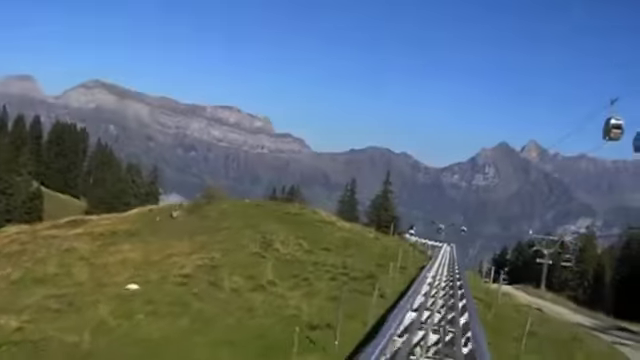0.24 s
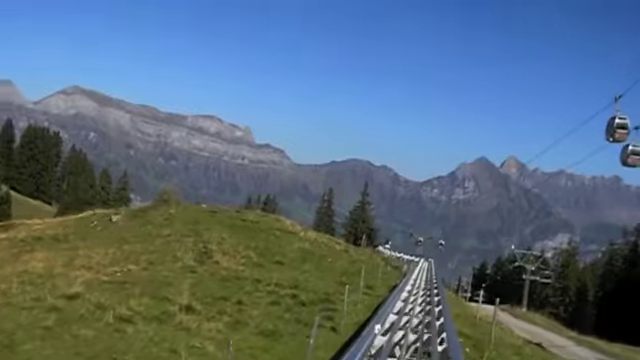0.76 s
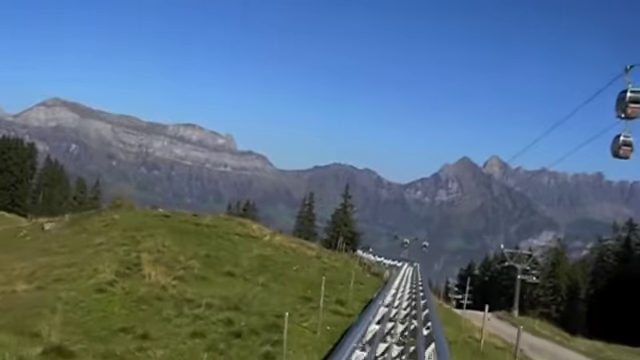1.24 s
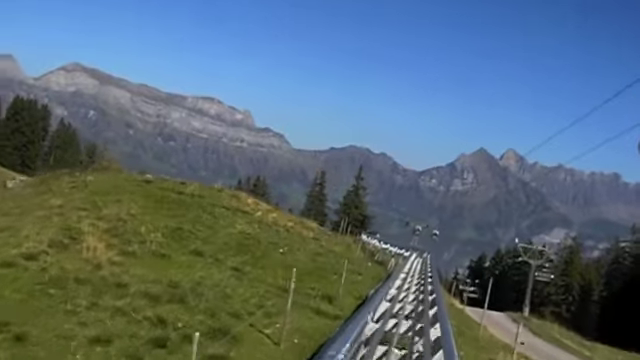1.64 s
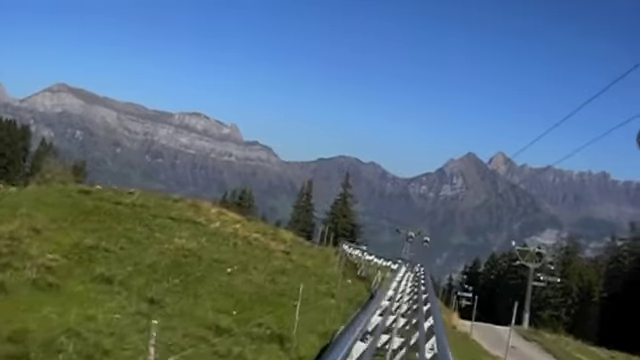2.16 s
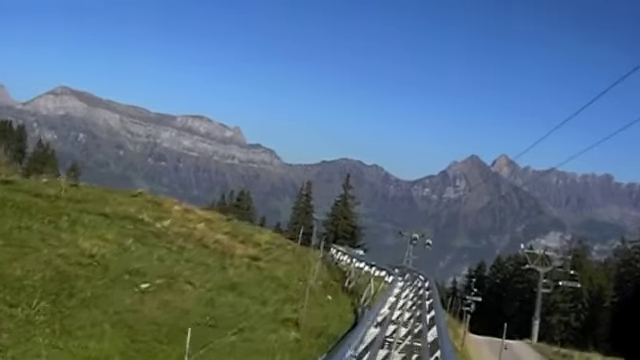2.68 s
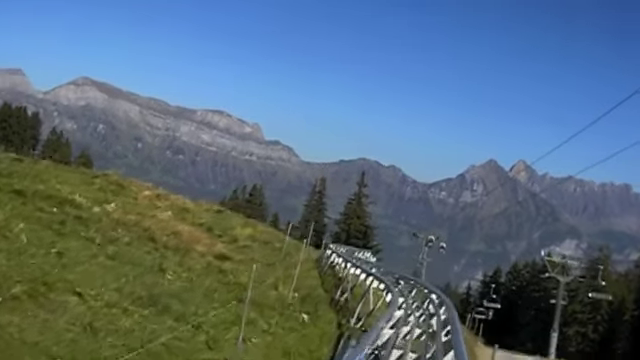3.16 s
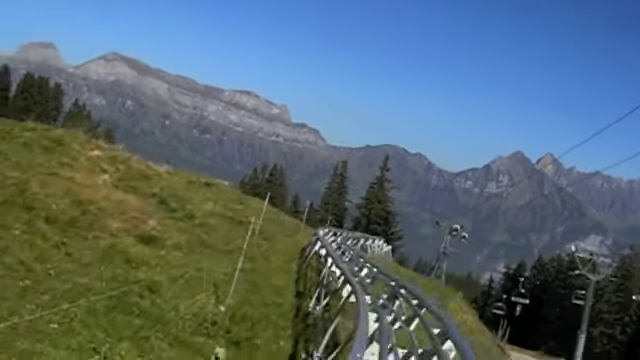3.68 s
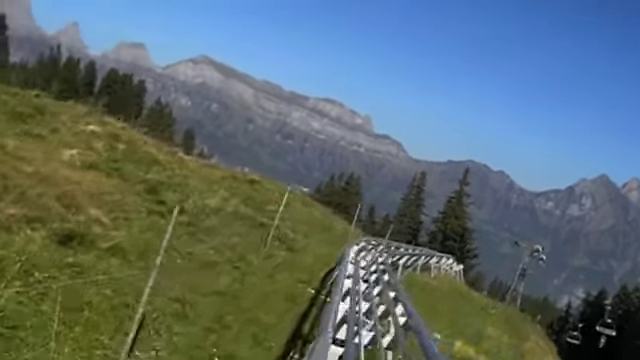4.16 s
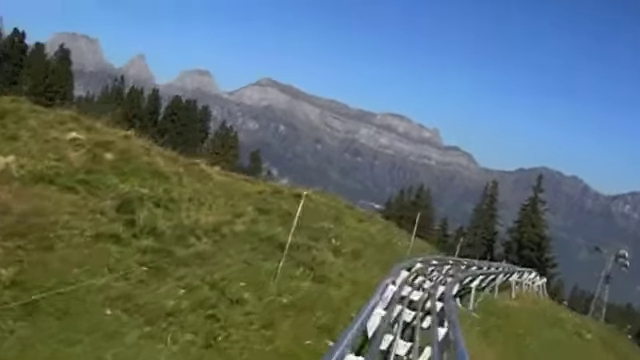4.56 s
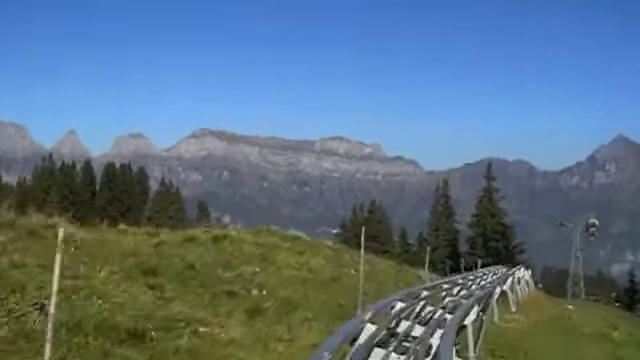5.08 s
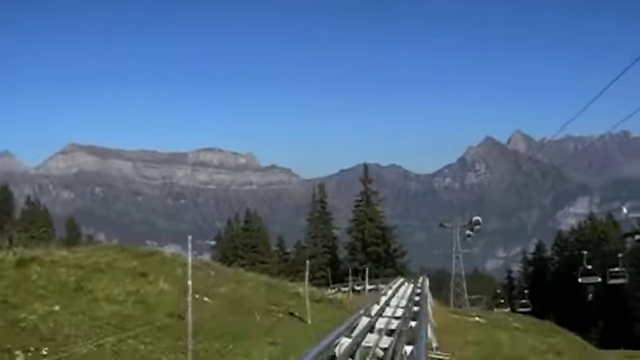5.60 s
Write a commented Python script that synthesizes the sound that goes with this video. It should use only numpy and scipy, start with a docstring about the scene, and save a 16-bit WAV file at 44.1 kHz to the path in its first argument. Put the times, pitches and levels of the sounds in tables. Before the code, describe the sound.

Wind rumbles and pops against the microphone on a coasting sled, then guide wheels rattle and grind metallically through a bend.

```python
"""A steel tube track in open air: a sled coasts down it with a microphone on board.
Head wind is filtered noise and clustered eddy pulses that rumble, flutter, thump and pop at the microphone.
Wheels hum as a few gliding harmonics, hiss as coloured noise and crack over joints in the track.
In the bend, guide wheels slap and grind as sprays of tiny impacts through ringing steel modes,
while gritty noise strokes scrape and narrow noise bands squeak on the rail."""
import sys
import numpy as np
from scipy import signal
from scipy.fft import rfft, irfft
from scipy.io import wavfile
from scipy.ndimage import uniform_filter1d

SR = 44100
rng = np.random.default_rng(int(sys.argv[2]) if len(sys.argv) > 2 else 0)


def waveform_to_disk(signal):
    """Save audio, clipped to [-1, 1], as 16-bit WAV at the path in sys.argv[1]."""
    frames = np.transpose(np.atleast_2d(signal))
    scaled = np.clip(frames, -1, 1) * 32767
    samples = np.round(scaled).astype(np.int16)
    wavfile.write(sys.argv[1], SR, samples)


N = 257544
TIME = np.arange(N) / SR
FREQS = np.fft.rfftfreq(N, 1 / SR)

# Head wind driving rumble and flutter. Each row: time in seconds, level in dB before the offsets in each layer.
WIND = [(0, -32), (.7, -31.5), (.97, -29.5), (1.2, -39), (1.29, -33), (1.6, -40.5), (1.69, -29.5),
        (1.79, -36.5), (1.91, -38.5), (1.97, -49), (2.22, -41), (2.5, -43), (2.75, -39), (3.12, -37),
        (3.38, -32.5), (3.49, -36), (3.56, -30), (3.8, -33), (4.05, -26), (4.2, -31), (4.228, -35),
        (4.5, -34.5), (4.75, -33.5), (4.9, -32), (5.04, -33), (5.15, -26.5), (5.33, -36), (5.62, -32.5),
        (5.84, -24.5)]
# Tone of the low rumble. Each row: frequency in Hz, relative gain in dB.
RUMBLE_COLOUR = [(15, -12), (30, -11), (60, 2), (100, 4.5), (150, 0), (230, -9), (400, -20), (900, -68),
                 (6000, -110)]
# Large eddies thumping the microphone. Each row: centre in seconds, level in dB.
THUMPS = [(.005, -17.5), (.19, -22), (.285, -20.5), (.905, -21), (1.29, -22), (1.75, -21), (2.66, -22),
          (2.73, -28), (3.29, -23), (3.87, -25), (4.2, -21.5), (4.52, -24), (4.9, -21.5), (5.3, -24.5),
          (5.835, -26)]
# Tone of the wind flutter. Each row: frequency in Hz, relative gain in dB.
FLUTTER_COLOUR = [(50, -18), (130, 5.5), (250, 2), (450, -3), (850, -9.5), (1300, -16), (2000, -28),
                  (3200, -51.5), (6000, -67.5), (15000, -52.5)]
# Single eddies hitting the microphone port. Each row: time in seconds, level in dB, centre in Hz.
POPS = [(.007, -4.5, 754), (.073, -16, 796), (.122, -18.5, 607), (.128, -12.5, 240), (.27, -16, 420),
        (0.306, -8.5, 380), (.394, -19, 775), (.406, -13, 710), (0.469, -19, 795), (0.4992, -4.5, 604),
        (.51, -9, 300), (0.5368, -13.5, 600), (.627, -6.5, 585), (.693, -21, 750), (.753, -19, 640),
        (0.7858, -13, 705), (0.796, -11, 576), (.869, -17.5, 654), (.903, -15, 112), (.94, -22, 694),
        (.956, -16, 570), (.973, -24, 480), (.9805, -11.5, 339), (1.03, -30, 774), (1.052, -17, 520),
        (1.1205, -14, 328), (1.253, -16.5, 725), (1.261, -16, 420), (1.269, -15, 560), (1.294, -15.5, 380),
        (1.324, -13, 690), (1.331, -14, 250), (1.344, -20, 780), (1.415, -17, 530), (1.6685, -4, 573),
        (1.672, -12, 690), (1.6766, -4.5, 606), (1.695, -22, 900), (1.6994, -10, 750), (1.703, -7.5, 300),
        (1.7323, -8.5, 720), (1.736, -9.5, 252), (1.746, -11, 610), (1.7583, -9.5, 486),
        (1.7663, -4.5, 560), (1.788, -24, 776), (1.8134, -8.5, 714), (1.821, -13.5, 417),
        (1.903, -20.5, 520), (1.919, -25, 776), (2.328, -13, 398), (2.63, -23, 469), (2.699, -21.5, 706),
        (2.729, -17.5, 495), (2.95, -10, 440), (2.988, -16, 600), (3.017, -13.5, 470), (3.066, -16.5, 705),
        (3.169, -16.5, 250), (3.266, -16, 553), (3.286, -10.5, 600), (3.314, -14, 380), (3.344, -11, 457),
        (3.399, -7, 440), (3.408, -15, 590), (3.52, -10, 434), (3.557, -12, 330), (3.573, -6.5, 560),
        (3.636, -19, 448), (3.688, -13, 520), (3.698, -11, 450), (3.707, -7, 436), (3.779, -9, 360),
        (3.8266, -7.5, 477), (3.86, -13, 200), (3.866, -10.5, 484), (3.873, -11.5, 680),
        (3.938, -12.5, 545), (3.946, -10.5, 347), (4.0258, -4.5, 686), (4.037, -10.5, 400),
        (4.057, -17, 396), (4.079, -10, 200), (4.158, -18, 420), (4.193, -10, 500), (4.202, -14, 550),
        (4.207, -6.5, 396), (4.302, -12, 684), (4.5, -11.5, 222), (4.512, -9, 455), (4.535, -13, 200),
        (4.655, -11.5, 680), (4.773, -13, 597), (4.87, -12.5, 450), (4.907, -12, 164), (4.927, -10.5, 581),
        (4.9545, -12.5, 710), (4.987, -7.5, 343), (5.15, -13, 655), (5.185, -12.5, 610), (5.296, -14, 750)]
# Gliding wheel hum. Each row: time in seconds, pitch in Hz, level in dB.
HUM = [(0, 180.7, -30), (0.701, 174.5, -36.5), (1.55, 162.1, -32.5), (1.95, 161.6, -39.5), (2.4, 160, -35),
       (2.801, 157, -37), (3.3, 147.8, -34), (3.55, 198.4, -29.5), (4.152, 180.1, -35), (4.28, 178, -30),
       (4.52, 173.3, -24), (4.66, 176.9, -36), (4.85, 177.2, -36.5), (5.1, 178.2, -45),
       (5.35, 176.8, -28.5), (5.55, 175.8, -29.5), (5.73, 175.2, -21), (5.84, 178.4, -29)]
# Harmonics of the hum. Each row: multiple of the pitch, relative level in dB.
HUM_ORDERS = [(1, -5), (2, -22.5), (3, -23.5), (5, -23.5)]
# Wheels rolling on the tube. Each row: time in seconds, hiss level in dB before ROLL_LIFT_DB.
ROLLING = [(0, -61.5), (.8, -61), (1.7, -59.5), (1.85, -65), (2.7, -62.5), (3.45, -60), (5.84, -53)]
# Tone of the rolling hiss. Each row: frequency in Hz, relative gain in dB.
ROLL_COLOUR = [(200, 21.5), (850, 20), (1400, 11), (2200, 4.5), (2550, 6), (3100, 0.5), (3750, -0.5),
               (4150, -2.5), (4550, -2), (5100, -6), (5900, -9), (7300, -15), (7750, -18.5), (8600, -18.5),
               (15500, -27.5)]
# Ringing of the steel frame. Each row: centre in Hz, width in Hz, nominal relative strength in dB.
FRAME_MODES = [(465, 81, 8), (562, 32, 4.5), (747, 25, 12), (895, 16, 12.5), (1064.6, 37, 11.5),
               (1452, 35, 4.5), (1716, 35, 8.5), (1970, 140, 4.5), (2346, 174, 7), (2620, 74, 5.5),
               (3280, 56, 4.5), (3710, 49, 3), (4100, 70, 0.5), (4380, 24, 2.5), (4830, 70, -2.5),
               (5800, 210, 3.5), (6880, 130, 6)]
# Broad tone of the frame. Each row: frequency in Hz, relative gain in dB.
FRAME_COLOUR = [(200, -13.5), (450, 5.5), (900, 3.5), (1400, 1), (2100, -7), (2600, -5), (3000, -9),
                (4900, -17.5), (6200, -25), (7000, -28.5), (7900, -24), (10000, -30.5), (15500, -30)]
# Steel scuffing the rail. Each row: start in seconds, level in dB, decay in seconds, brightness in dB per octave.
SCRAPES = [(0.217, -28, 0.0019, -7.5), (1.066, -28, 0.0043, -12.5), (1.698, -42, 0.00035, -7),
           (2.252, -36, 0.0037, -8.5), (3.566, -37, 0.011, -7.5), (3.651, -38.5, 0.014, -1),
           (3.675, -39, 0.015, -2.5), (3.817, -35, 0.011, 0.5), (3.96, -46, .008, 0),
           (3.971, -32.5, 0.02, -2.5), (3.986, -42, 0.016, -1.5), (4.02, -51, 0.56, 1),
           (4.142, -46, 0.011, -1), (4.161, -33, 0.031, -9), (5.382, -32.5, 0.02, -4.5),
           (5.403, -23.5, 0.0071, -8.5), (5.418, -36.5, 0.014, 1.5), (5.441, -45, 0.014, 0)]
# Tone of the scrapes. Each row: frequency in Hz, relative gain in dB.
SCRAPE_COLOUR = [(600, -4), (1800, 3), (3600, 2.5), (4700, 1.5), (6000, -4), (8500, -9.5), (12000, -14.5),
                 (15500, -25)]
# Wheels striking joints in the track. Each row: start in seconds, level in dB, ring in Hz.
JOINTS = [(.4982, -15, 2100), (.5357, -22, 2000), (.627, -26, 2100), (1.6965, -21.5, 2300),
          (1.7322, -21, 2500), (1.7542, -24, 2000), (1.813, -24, 2100), (3.5715, -15.5, 1700)]
# Side load on the guide wheels. Each row: time in seconds, reference level in dB for slaps, grind and singing.
BEND = [(3.3, -70), (3.6, -58), (3.8, -43), (4.05, -40.5), (4.9, -40.5), (5.2, -35), (5.5, -42.5),
        (5.84, -36.5)]
# Hardest knocks on the rail. Each row: centre in seconds, level of the force in dB before the frame colours it.
CLACKS = [(3.607, -29), (3.781, -30), (3.856, -25), (3.884, -22.5), (3.927, -22), (3.95, -24), (4.074, -26),
          (4.205, -20.5), (4.231, -26), (4.267, -22.5), (4.3, -25), (4.331, -24.5), (4.386, -22.5),
          (4.41, -21), (4.446, -27), (4.468, -24), (4.505, -24), (4.531, -25.5), (4.563, -23.5),
          (4.582, -23), (4.624, -22), (4.647, -22), (4.678, -24), (4.702, -20), (4.751, -37),
          (4.795, -24.5), (4.822, -23), (4.845, -26.5), (4.92, -29), (4.941, -22.5), (4.964, -25.5),
          (5.001, -23), (5.029, -23), (5.062, -27), (5.09, -25), (5.116, -21.5), (5.149, -26),
          (5.173, -23.5), (5.205, -23), (5.235, -30), (5.295, -23), (5.321, -24.5), (5.348, -22),
          (5.404, -31), (5.469, -23.5), (5.539, -24), (5.562, -24.5), (5.592, -23.5), (5.622, -29),
          (5.645, -20.5), (5.682, -26), (5.706, -15.5), (5.764, -16.5), (5.799, -20.5), (5.821, -20.5)]
# High rail modes rung by a sliding wheel. Each row: centre in Hz, width in Hz, relative level in dB.
RAIL_MODES = [(2590, 270, 2.5), (3206, 51, -5), (4900, 180, 1.5), (7000, 270, -11), (9400, 370, -17.5),
              (12200, 200, -21.5)]
# Guide wheel slips. Each row: centre in seconds, level in dB before SQUEAK_DB, half length in seconds,
# brightness in dB per octave.
SLIPS = [(4.078, -40.5, 0.019, 3), (4.197, -45, 0.021, 4), (4.535, -45, .008, 2), (4.582, -39, 0.015, 3),
         (4.628, -49, 0.012, -2), (4.66, -45, .008, 2), (4.706, -42, 0.0073, -5), (4.76, -42, 0.012, 1),
         (5.017, -45, 0.013, 2), (5.292, -44, 0.013, 3), (5.383, -37, 0.012, 2), (5.627, -43, .012, 3),
         (5.713, -44, .012, -3)]

RUMBLE_DB, RUMBLE_FOLLOW = -12, 0.52  # rumble level = RUMBLE_DB + this share of the wind level
RUMBLE_SWAY_DB, RUMBLE_SWAY_HZ = 2.1, 14  # lumps in the rumble with gaps between
THUMP_S = 0.02  # half length of a thump
FLUTTER_SWAY_DB, FLUTTER_SWAY_HZ = 1.6, 18  # chance unsteadiness of the flutter
KNOT_DB = -26  # small eddies around each pop, against the pop
KNOT_LEAD_S, KNOT_TAIL_S = 0.009, 0.009  # build-up and decay times of a knot
# Hard front of small eddies: level and pitch against the pop, and the centre above which it shows.
CRACK_DB, CRACK_RATIO, CRACK_ABOVE_HZ = -13.5, 2.8, 700
ROLL_LIFT_DB = 2.0
SCRAPE_STUTTER_DB = 1.6  # a slide catches and lets go
JOINT_DECAY_S, JOINT_GRIT_DB = .0008, -11  # loaded wheel damps the ring; crack against ring
TURN_HZ = 36.2  # turning rate of the guide wheels
SLAP_DB, SLAP_SPREAD_DB = 9, 3.5  # lesser slaps: force against BEND, chance spread
SLAP_JITTER_S = 0.0065  # scale of their uneven timing
CONTACT_RISE_S, CONTACT_FALL_S = .0034, 0.0074  # nominal build-up and release of slap pressure
CONTACT_SPREAD = 1.4  # slaps are up to this many times longer or shorter
KNOCK_DB, GRIND_DB = -1.0, -7.5  # gain of the knocks; steady grinding against BEND
SING_DB, SQUEAK_DB = -18, -8.5  # singing against BEND before the squeak gain; gain of all squeaks
EDGE_HZ = 15800  # upper band limit of the microphone


def amp(db):
    """Decibels to gain."""
    return 10 ** (np.asarray(db) / 20)


def curve(rows):
    """A control curve at every sample."""
    return np.interp(TIME, *np.transpose(rows))


def colour(points):
    """Gain at every frequency from (Hz, dB) points."""
    hz, db = np.transpose(points)
    return amp(np.interp(np.log(FREQS + 1), np.log(hz), db))


def lowpassed(x, gain):
    """Weights the spectrum with a gain, without shifting its phase."""
    return irfft(rfft(x) * gain, N)


def shaped(x, gain):
    """Causal minimum-phase filter with the given gain at every frequency."""
    cepstrum = irfft(np.log(np.maximum(gain, 1e-6)), N)
    # folding the cepstrum puts the energy at the start of the response
    cepstrum[1:N // 2] *= 2
    cepstrum[N // 2 + 1:] = 0
    response = irfft(np.exp(rfft(cepstrum)), N)[:4096]
    return signal.oaconvolve(x, response)[:N]


def evened(x, band=(0, SR)):
    """Scales x to rms 1 within a band in Hz."""
    inside = lowpassed(x, (FREQS >= band[0]) & (FREQS <= band[1]))
    return x / (inside.std() + 1e-12)


def levelled(x, size):
    """Flattens slow level changes by the running rms over size samples."""
    return x / np.sqrt(uniform_filter1d(x ** 2, size=size) + 1e-12)


def wander(hz):
    """Smooth chance movement of rms 1, mostly slower than hz."""
    return evened(lowpassed(rng.standard_normal(N), np.exp(-(FREQS / hz) ** 2)))


def add(mix, s, sound):
    """Mixes a sound in at time s."""
    part = mix[max(round(s * SR), 0):][:len(sound)]
    part += sound[:len(part)]


def bell(s, half_s, limit):
    """Bell-shaped swell around time s."""
    return np.exp(-np.minimum(((TIME - s) / half_s) ** 2, limit))


def swells(events, half_s):
    """Power of short bell-shaped swells at rows of (s, dB)."""
    return sum(amp(db) ** 2 * bell(s, half_s, 40) for s, db in events)


def rumble():
    """Large eddies blur into a low rumble with thumps; its deepest part thins as the sled leans in the bend."""
    air = shaped(rng.standard_normal(N), colour(RUMBLE_COLOUR))
    deep = lowpassed(air, 1 / (1 + (FREQS / 70) ** 4))
    deep_db = np.interp(TIME, [.9, 1.6, 3.2, 3.9, 5.0, 5.7], [6.0, 5, 3, -3.5, -8.5, -1.0])
    air = air + deep * (amp(deep_db) - 1)
    air = evened(levelled(air, size=3000), band=(30, 150))
    sway_db = RUMBLE_SWAY_DB * wander(hz=RUMBLE_SWAY_HZ)
    steady = amp(RUMBLE_DB + RUMBLE_FOLLOW * curve(WIND) + sway_db)
    return air * np.sqrt(steady ** 2 + swells(THUMPS, THUMP_S))


def eddy(t, hz, skew, steep=3.53):
    """Pressure of a vortex passing the port: one smooth swing, shorter for a smaller vortex."""
    return (np.exp(2j * np.pi * skew) / (1 - 2j * np.pi * hz * t / steep) ** (steep + 1)).real


def knots():
    """Strength of the turbulence that builds up to each pop and dies after it."""
    power = np.zeros(N)
    t = np.arange(-SR // 10, SR // 10) / SR
    shape = np.exp(np.minimum(t / KNOT_LEAD_S, -t / KNOT_TAIL_S))
    for s, db, _ in POPS:
        add(power, s + t[0], (amp(db + KNOT_DB) * shape[s + t >= 0]) ** 2)
    return np.sqrt(power)


def buffeting():
    """Small eddies of many sizes come in clumps of puffs, stronger in more wind and around each pop."""
    puffs = np.zeros(N)
    t = np.arange(-400, 401) / SR
    for hz in np.geomspace(150, 1500, num=8):
        hits = (rng.random(N) < 110 / SR) * rng.uniform(-1.48, 1, N)  # about 110 per second
        puffs += signal.oaconvolve(hits, eddy(t, hz, rng.random()), "same") * (hz / 500) ** 0.76
    # flatten the broad spectrum but keep the grain of the puffs
    spectrum = rfft(puffs)
    smooth = np.sqrt(uniform_filter1d(abs(spectrum) ** 2, size=1500).clip(0))
    grain = evened(irfft(spectrum / (smooth + smooth.max() * 1e-4), N))
    clumps = amp(2.35 * wander(hz=78.6))
    turbulence = (grain + amp(-5.0) * rng.standard_normal(N)) * clumps
    flutter = levelled(shaped(turbulence, colour(FLUTTER_COLOUR)), size=3500)
    flutter = evened(flutter, band=(250, 1100))
    crisp = flutter - lowpassed(flutter, 1 / (1 + (FREQS / 1100) ** 4))
    # wind straight into the port is crisper
    facing_db = np.interp(TIME, [1.1, 2.0, 3.5, 5.0], [4.5, 5.5, -3, -3.5])
    sheltered_db = np.interp(TIME, [1.0, 3.0, 4.2, 4.9, 5.4], [0.0, 2.0, 1.8, 2.5, -9.5])
    sway_db = FLUTTER_SWAY_DB * wander(hz=FLUTTER_SWAY_HZ)
    steady = amp(curve(WIND) + sheltered_db + sway_db)
    return flutter * np.hypot(steady, knots()) + crisp * (amp(facing_db) - 1) * steady


def pops():
    """The strongest eddies stand out as dull knocks, small ones with a hard crack, all with a faint tick."""
    out = np.zeros(N)
    t = np.arange(-300, 900) / SR
    fade = signal.windows.tukey(len(t), .2)
    for s, db, hz in POPS:
        tick = amp(-39.0) * (hz / 700) * np.exp(-abs(t) / 0.00016) * rng.standard_normal(len(t))
        # mostly a push and a pull of like size
        skew = rng.choice([.25, .75]) + rng.uniform(-0.049, 0.049)
        crack_gain = amp(CRACK_DB) / (1 + (CRACK_ABOVE_HZ / hz) ** 20)
        crack = crack_gain * eddy(t, hz * CRACK_RATIO, skew, steep=7.4)
        add(out, s + t[0], amp(db) * (eddy(t, hz, skew) + crack + tick) * fade)
    return out


def hum():
    """Slightly uneven wheels drone in a few harmonics of a gliding, wavering pitch."""
    s, pitch, level = np.transpose(HUM)
    waver = 1 + 0.02557 * wander(hz=21.8)
    turns = np.cumsum(np.interp(TIME, s, pitch) * waver) / SR
    tone = sum(amp(db) * np.sin(2 * np.pi * round(k) * turns) for k, db in HUM_ORDERS)
    return evened(tone * amp(3.5 * wander(hz=22))) * amp(np.interp(TIME, s, level))


def ringing(modes):
    """Power response of a set of (Hz, width, dB) modes."""
    return sum(amp(db) ** 2 / (1 + (2 * (FREQS - hz) / width) ** 2) for hz, width, db in modes)


def rolling():
    """Fine roughness of tube and tyres makes a steady hiss, lightly coloured by the frame."""
    gain = colour(ROLL_COLOUR) * np.sqrt(1 + 0.14 * ringing(FRAME_MODES))
    hiss = shaped(rng.standard_normal(N) * amp(0.93 * wander(hz=120)), gain)
    return evened(hiss, band=(3200, 7000)) * amp(curve(ROLLING) + ROLL_LIFT_DB)


def scrapes():
    """Short gritty slides of steel on steel, shaped by a soft onset and an exponential decay."""
    out = np.zeros(N)
    stutter = amp(1.2 * wander(hz=300) + SCRAPE_STUTTER_DB * wander(hz=80))
    grit = rfft(rng.standard_normal(N) * stutter) * colour(SCRAPE_COLOUR)
    octaves = np.log2(np.maximum(FREQS, 500) / 4000)
    for s, db, decay, bright_db in SCRAPES:
        age = np.maximum(TIME - s, 0)
        stroke = (1 - np.exp(-age / 0.0057)) * np.exp(-np.minimum(age / decay, 20))
        slide = evened(irfft(grit * amp(bright_db * octaves), N))
        out += amp(db) * stroke / stroke.max() * slide
    return out


def joints():
    """Each joint gives a gritty crack and a ring of a few cycles."""
    out = np.zeros(N)
    t = np.arange(600) / SR
    blow = (1 - np.exp(-t / 0.00016)) * np.exp(-t / JOINT_DECAY_S)
    for s, db, hz in JOINTS:
        grit = signal.lfilter(*signal.butter(2, 3000, fs=SR), rng.standard_normal(len(t)))
        ring = np.sin(2 * np.pi * hz * t) + amp(JOINT_GRIT_DB) * grit / grit.std()
        add(out, s, amp(db) * ring * blow / blow.max())
    return out


def frame(force, vary_db=4):
    """The steel frame: a broad response with ringing modes, whose mix depends on where it is struck."""
    modes = [(hz, width, db + vary_db * rng.uniform(-1.2, 1)) for hz, width, db in FRAME_MODES]
    gain = colour(FRAME_COLOUR) * np.sqrt(0.21 + ringing(modes))
    return shaped(force, gain / np.sqrt(np.mean(gain ** 2)))


def slaps():
    """Rows of (s, dB): the hard knocks, and a lesser slap about once a wheel turn between them."""
    rows = list(CLACKS)
    for (start, _), (end, _) in zip(CLACKS, CLACKS[1:]):
        turns = max(round((end - start) * TURN_HZ), 1)
        for s in np.linspace(start, end, turns + 1)[1:-1]:
            level_db = np.interp(s, *np.transpose(BEND)) + SLAP_DB
            rows.append((s + SLAP_JITTER_S * rng.uniform(-1.2, 1), level_db))
    return rows


def asperities(per_s):
    """Tiny impacts of the rough surfaces over a faint smooth rub, rms 1."""
    return evened(rng.standard_normal(N) * (0.075 + (rng.random(N) < per_s / SR)))


def chatter():
    """Side-loaded guide wheels grind and slap the rail; each slap sprays tiny impacts on one of a few spots."""
    spots = 4
    chance = rng.uniform(-1, 1, (200, 3))
    pressure = np.zeros((spots, N))
    t = np.arange(-600, 1400) / SR
    side_s = np.where(t < 0, CONTACT_RISE_S, CONTACT_FALL_S)
    for k, ((s, db), (luck, place, length)) in enumerate(zip(slaps(), chance)):
        contact = np.exp(-(t / side_s / CONTACT_SPREAD ** length) ** 2)
        spread_db = SLAP_SPREAD_DB * luck * (k >= len(CLACKS))  # only the lesser slaps vary
        spot = int((place + 1) / 2 * spots)
        add(pressure[spot], s + t[0], amp(db + spread_db) * contact)
    knocks = sum(frame(p * asperities(per_s=1600)) for p in pressure)
    # hard contact is bright
    hardness = [(300, -11), (1000, -5), (1800, -0.5), (2500, -5.5), (4000, 2.5), (7000, -1), (12000, -4.0)]
    knocks = shaped(knocks, colour(hardness))
    crackle = asperities(per_s=600) * amp(3.5 * wander(hz=110))
    grind = evened(frame(crackle, vary_db=1), band=(1600, 3000))
    return grind * amp(curve(BEND) + GRIND_DB) + amp(KNOCK_DB) * knocks


def squeaks():
    """The rail sings faintly under side load and louder where a wheel slips, each time with another mode mix."""
    out = np.zeros(N)
    load = amp(curve(BEND) + SING_DB)
    for hz, width, mode_db in RAIL_MODES:
        band = lowpassed(rng.standard_normal(N), 1 / (1 + ((FREQS - hz) / width) ** 2))
        # the pitch shifts as the contact moves
        drift = np.cumsum(hz * .007 * wander(hz=14.4)) / SR
        tone = evened((signal.hilbert(band) * np.exp(2j * np.pi * drift)).real)
        octaves = np.log2(hz / 5000)
        rub = sum(amp(db + bright_db * octaves) * bell(s, half_s, 20)
                  for s, db, half_s, bright_db in SLIPS)
        out += amp(mode_db) * tone * (rub + load)
    stutter = amp(3 * wander(hz=130))  # stick and slip
    return amp(SQUEAK_DB) * out * stutter


def scene():
    """Wind and sled, both right at the microphone in open air."""
    wind = rumble() + buffeting() + pops()
    wheels = hum() + rolling() + joints()
    rail = scrapes() + chatter() + squeaks()
    return (wind + wheels + rail)[None]


def record(dry):
    """The microphone's band limit: a steep low-pass."""
    taps = signal.firwin(511, EDGE_HZ, window=("kaiser", 9), fs=SR)
    return signal.oaconvolve(dry, taps[None], "same")


dry = scene()
out = record(dry)
waveform_to_disk(out)
```